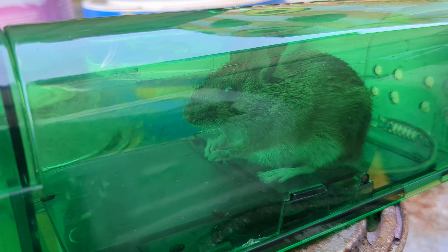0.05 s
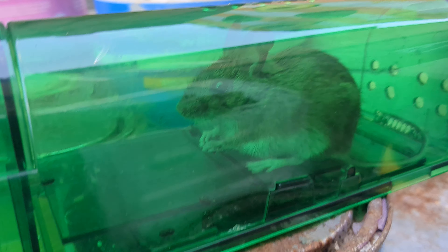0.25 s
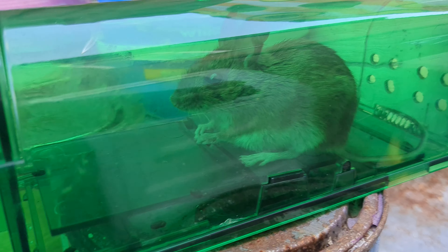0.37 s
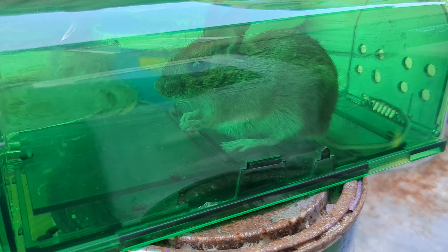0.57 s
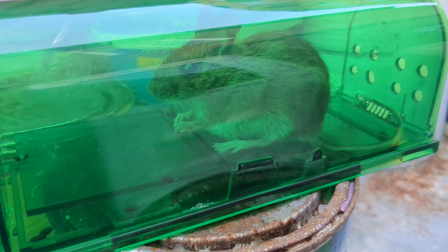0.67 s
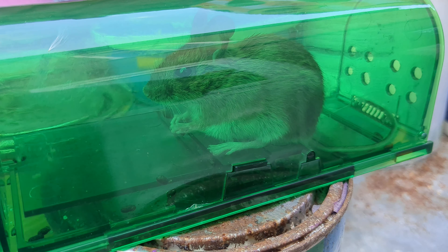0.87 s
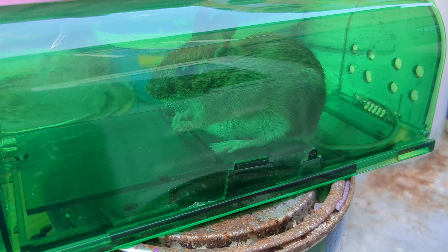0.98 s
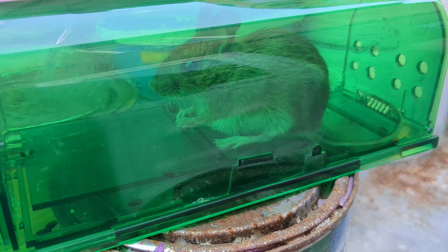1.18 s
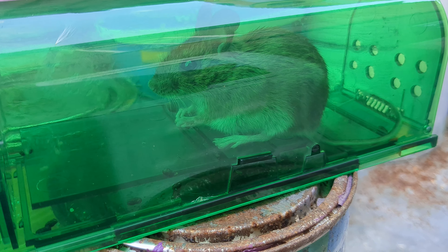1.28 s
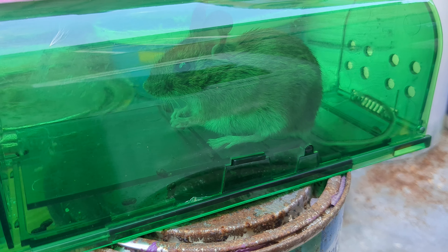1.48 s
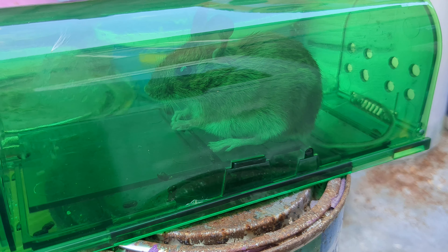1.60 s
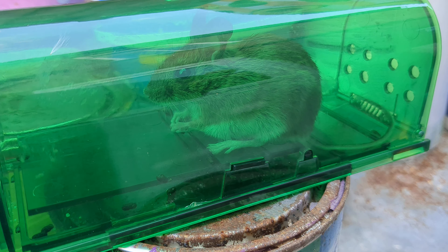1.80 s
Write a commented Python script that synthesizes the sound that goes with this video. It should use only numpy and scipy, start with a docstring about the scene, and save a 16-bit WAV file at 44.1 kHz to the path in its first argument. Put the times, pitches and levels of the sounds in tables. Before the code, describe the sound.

A hand rubs the camera close to the right microphone from about 0.3 to 0.5 seconds, a short rasp with a low juddering bump and a tiny squeak. Distant traffic rumble and engine drone continue throughout, with light wind on the microphone early on. Faint finger scuffs come near 0.9 and 1.5 seconds. Small birds give thin rising chirps from 0.8 seconds, clearest around 1.2 and 1.8.

```python
"""Outdoors, a hand shifts its grip on the camera. Skin rasps across the case by the right microphone
port, sticks and slips in a low judder that rings the case, squeaks once and bumps the body, with light
brushes and faint scuffs before and after. Behind it sit a distant traffic rumble with an engine drone,
an airy hiss, light wind on the ports and a few rising chirps of small birds."""
import sys
import numpy as np
from scipy import signal
from scipy.fft import rfft, irfft
from scipy.io import wavfile

SR = 44100
rng = np.random.default_rng(int(sys.argv[2]) if len(sys.argv) > 2 else 0)


def unload_audio(sound):
    """Save the sound as a 16-bit wav file, at the path given as the first command line argument."""
    columns = np.transpose(np.atleast_2d(sound))
    # keep every value between -1 and 1, then stretch to whole-number steps
    steps = np.round(np.clip(columns, -1, 1) * 32767)
    wavfile.write(sys.argv[1], SR, steps.astype(np.int16))


N = 81585


def undb(db):
    """Decibels to gain."""
    return 10 ** (np.asarray(db) / 20)


def unit(x):
    """Scale to rms 1."""
    return x / np.sqrt(np.mean(x ** 2))


def clock():
    """Time of each sample in seconds."""
    return np.arange(N) / SR


def fader(curve):
    """Gain ride through (t/s, level/dB) points, fading fast outside them."""
    s, db = np.array(curve).T
    t = clock()
    outside = np.maximum(s[0] - t, 0) + np.maximum(t - s[-1], 0)
    return undb(np.interp(t, s, db)) * np.exp(-20 * outside)


def colour(x, points):
    """EQ through (f/Hz, level/dB) points, rolled off below the first; rms 1."""
    hz, db = np.array(points).T
    f = np.maximum(np.fft.rfftfreq(N, 1 / SR), 1)
    gain = undb(np.interp(np.log(f), np.log(hz), db)) * np.minimum(f / hz[0], 1) ** 2
    return unit(irfft(rfft(x) * gain, N))


def noise():
    """White noise."""
    return rng.standard_normal(N)


def band(hz, width_hz):
    """A band of noise around one frequency; rms 1."""
    f = np.fft.rfftfreq(N, 1 / SR)
    return unit(irfft(rfft(noise()) / (1 + ((f - hz) / width_hz * 2) ** 4), N))


def grains(per_s, scatter_db):
    """Dense tiny clicks at random times, their sizes spread by scatter_db."""
    clicks = (rng.random(N) < per_s / SR) * np.sign(noise())
    return clicks * undb(scatter_db * np.minimum(rng.exponential(size=N), 4))


def swell(start, length, attack, release):
    """Attack, hold and exponential release, in seconds."""
    t = clock() - start
    return np.clip(t / attack, 0, 1) * np.exp(-np.maximum(t - length, 0) / release)


def near_right(make, left_db):
    """A sound at the right port and its weaker, unrelated share at the left."""
    return np.array([undb(left_db) * make(), make()])


def engine():
    """A far engine drones in narrow bands of noise."""
    drones = [(46.1, 12.4, -45.5), (219.7, 32, -59.5), (250, 30.6, -54.5), (382.7, 22, -65),
              (673, 65, -65.5)]  # engine bands: f/Hz, width/Hz, level/dB
    ride = [(0, -1.5), (.8, 1), (1.55, -1.5), (1.85, -9.5)]  # swell and fade: t/s, level/dB
    return sum(undb(db) * band(hz, width_hz) for hz, width_hz, db in drones) * fader(ride)


def traffic(port_spacing_m=.1, left_lead_s=.00034):
    """Diffuse rumble, alike at both ports in the bass, and the engine; both reach the left first."""
    eq = [(25, -1), (60, 4), (110, -3), (180, -2), (270, -3), (320, -9.5), (700, -9), (950, -10.5),
          (1300, -20.5), (2000, -25.5), (3000, -37.5), (4200, -48), (5500, -54), (9000, -56.5),
          (15000, -58)]  # rumble spectrum: f/Hz, level/dB
    ride = [(0, -44), (.6, -47), (1.05, -47.5), (1.45, -49), (1.85, -50)]  # rumble loudness: t/s, level/dB
    likeness = .93 * np.sinc(2 * np.fft.rfftfreq(N, 1 / SR) * port_spacing_m / 343)
    mid, side = (irfft(rfft(noise()) * np.sqrt(1 + sign * likeness), N) for sign in (1, -1))
    rumble = np.array([colour(mid + side, eq), colour(mid - side, eq)]) * fader(ride)
    engine_side = undb(-20.5) * np.array([[1], [-1]]) * engine()
    left, right = rumble + engine() + engine_side
    return np.array([left, np.interp(clock() - left_lead_s, clock(), right)])


def air():
    """A faint airy hiss, stronger on the right."""
    eq = [(1500, -2), (2800, 1.5), (4200, 0), (5200, -12), (7000, -13.5), (10000, -24), (15000, -31)]  # hiss spectrum: f/Hz, level/dB
    ride = [(0, -67.5), (.7, -66.5), (1.2, -68.5), (1.5, -67.5), (1.6, -70.5), (1.85, -67.5)]  # hiss loudness: t/s, level/dB
    return fader(ride) * near_right(lambda: colour(noise(), eq), left_db=-7)


def wind(right_db=-8):
    """Light, low buffeting, different at each port."""
    gusts = [(0, -44.5), (.22, -31.5), (.36, -32.5), (.6, -36.5), (.75, -45.5), (1.15, -66), (1.29, -40.5),
             (1.42, -48.5), (1.85, -57)]  # wind on the ports: t/s, level/dB
    eq = [(15, 15.5), (35, -1.5), (70, -2), (130, -19), (250, -33.5), (800, -65.5)]  # buffeting spectrum: f/Hz, level/dB
    return fader(gusts) * np.array([colour(noise(), eq), undb(right_db) * colour(noise(), eq)])


def rasp():
    """Skin ridges catch on the case in thousands of tiny clicks a second."""
    ride = [(0, -56.5), (.29, -55), (.335, -45.5), (.37, -35), (.412, -30), (.432, -32), (.443, -43.5),
            (.46, -32), (.49, -52), (.6, -69), (.7, -79)]  # loudness of the drag: t/s, level/dB
    eq = [(300, 8), (800, 6), (1400, 4), (2400, 0.5), (4000, -12), (5500, -28), (9000, -33), (15000, -43)]  # rasp spectrum: f/Hz, level/dB
    return fader(ride) * near_right(lambda: colour(grains(per_s=4400, scatter_db=0), eq), left_db=-39)


def skin_hiss(eq, tilt):
    """Grainy hiss of light skin contact, its EQ tilted by so many dB per octave."""
    tilted = [(hz, db + tilt * np.log2(hz / eq[0][0])) for hz, db in eq]
    return near_right(lambda: colour(grains(per_s=9000, scatter_db=-.5), tilted), left_db=-26)


def brushes():
    """Skin sweeps lightly over the case in soft strokes of hiss."""
    # strokes: t/s, length/s, attack/s, level/dB, tilt/(dB per octave)
    strokes = [(0.104, 0.067, .02, -78, 21), (0.292, 0.069, 0.032, -51, 8.5),
               (0.332, 0.0837, 0.04, -39.5, -1.5), (0.441, 0.06, 0.008, -57, -4.5),
               (0.505, 0.07, 0.018, -59, 1.5), (.57, 0.098, .01, -71, 5)]
    eq = [(1000, -20), (3000, 7.5), (5000, 0.5), (6800, -3), (8500, -9), (12000, -17), (14000, -27),
          (15500, -25)]  # brush spectrum: f/Hz, level/dB
    return sum(undb(db) * swell(start, length, attack, release=.0076) * skin_hiss(eq, tilt)
               for start, length, attack, db, tilt in strokes)


def scuffs():
    """Fingers graze the case in tiny ticks of hiss."""
    touches = [(0.215, 0.0016, -70, 1), (0.262, .008, -72, 6), (0.873, 0.011, -63.5, 2),
               (0.898, .004, -64, -1), (1.445, 0.0056, -65.5, 1), (1.479, .008, -70.5, 1),
               (1.512, 0.021, -62.5, -6)]  # finger touches: t/s, length/s, level/dB, tilt/(dB per octave)
    eq = [(1200, -1), (3500, 5), (7000, -3.5), (10000, -7.5), (12500, -13), (15000, -26)]  # scuff spectrum: f/Hz, level/dB
    return sum(undb(db) * swell(start, length, attack=.0018, release=.007) * skin_hiss(eq, tilt)
               for start, length, db, tilt in touches)


def slips(rate_hz=165, jitter=.25, scatter_db=2, noise_db=-3, ring_db=-6.5):
    """Skin sticks and slips at an uneven rate; each slip knocks the case and rings it briefly."""
    eq = [(50, -26), (90, 5), (135, 6.5), (200, -5.5), (420, -4), (700, -7), (1000, -21.5), (2000, -32.5),
          (6000, -65)]  # knock spectrum: f/Hz, level/dB
    modes = [(141.5, 0.079, 0.5), (296, 0.018, 1), (413, 0.037, -5), (496, 0.019, -4.5), (706, 0.021, -14)]  # case resonances: f/Hz, t60/s, level/dB
    gap, size = rng.standard_normal((400, 2)).T
    onsets = (np.cumsum(np.exp(jitter * gap)) * SR / rate_hz).astype(int)
    pulses = np.bincount(onsets, undb(scatter_db * size), N)[:N]
    kicks = unit(signal.hilbert(pulses).imag)  # each pulse becomes a two-way swing
    force = kicks + undb(noise_db) * noise()
    t = clock()
    case = sum(undb(db - 60 * t / t60) * np.sin(2 * np.pi * hz * t) for hz, t60, db in modes)
    ring = unit(signal.fftconvolve(force, case)[:N])
    return unit(colour(force, eq) + undb(ring_db) * ring)


def judder():
    """The dragging finger shudders in one short, low burst of slips by the right port."""
    ride = [(.30, -69), (.348, -39), (.362, -32.5), (.371, -17), (.395, -20.5), (.42, -15.5), (.44, -27.5),
            (.457, -20.5), (.485, -54), (.53, -49)]  # stick-slip loudness: t/s, level/dB
    return near_right(slips, left_db=-29) * fader(ride)


def bumps():
    """The hand presses and lets go; each bump is one soft swing of pressure at the ports."""
    # swings: t/s, width/s, level/dB, left minus right/dB, polarity (1 suction first, -1 push first)
    swings = [(0.3227, 0.0024, -40.5, 21, 1), (.413, .0045, -52, -8, 1), (0.435, 0.0034, -29, -16, -1),
              (0.4463, 0.0018, -25, 13, -1), (0.452, .012, -26, -21, 1), (0.491, 0.007, -33.5, -22, 1)]
    pressure = 0
    for centre, width, db, pan_db, polarity in swings:
        u = (clock() - centre) / width
        gains = undb(db + np.array([[pan_db], [-pan_db]]) / 2)
        pressure = pressure + np.sign(polarity) * gains * u * np.exp((1 - u ** 2) / 2)
    return pressure


def squeak(at_s=.366, width_s=.016, peak_db=-46):
    """The skin hisses at one pitch just before it grips."""
    envelope = undb(peak_db) * np.exp(-((clock() - at_s) / width_s) ** 2)
    return envelope * near_right(lambda: band(6500, width_hz=1600), left_db=-39)


def birds(left_db=-15, echo_db=-10, echo_delay_s=.015, echo_t60_s=.11):
    """Short, slightly airy whistles that rise and level off, with a brief echo from the walls."""
    # whistles: t/s, length/s, start f/Hz, end f/Hz, level/dB, wobble/share of pitch,
    # bend (1 is a straight rise, more levels off)
    chirps = [(0.77, 0.043, 4320, 4340, -67.5, 0.019, 1.5), (1.024, 0.026, 5450, 5550, -77, .01, 1.5),
              (1.083, 0.043, 6200, 6550, -75, .012, 1.8), (1.088, 0.051, 4900, 5270, -75, .012, 1.8),
              (1.172, 0.053, 3160, 4680, -61.5, 0.063, 1.8), (1.192, 0.055, 3700, 4170, -73, 0.075, 1.5),
              (1.678, 0.034, 6360, 6460, -65.5, .005, 1.3), (1.683, 0.029, 4870, 5210, -61.5, 0.0059, 1.5),
              (1.705, 0.023, 6520, 6580, -70.5, .006, 1.5), (1.772, 0.032, 5660, 6020, -65, 0.0065, 1.6),
              (1.789, 0.02, 5850, 6400, -60, .008, 1.1), (1.778, .032, 4650, 5130, -53, .003, 2.5)]
    hiss_eq = [(4500, 2), (7000, -2), (10000, -7), (13000, -14), (15000, -24)]  # airy edge of each chirp: f/Hz, level/dB
    hiss = undb(-22) * colour(noise(), hiss_eq)
    t, song = clock(), 0
    for start, length, start_hz, end_hz, db, wobble, bend in chirps:
        progress = np.clip((t - start) / length, 0, 1)
        glide_hz = end_hz + (start_hz - end_hz) * (1 - progress) ** bend
        hz = glide_hz * (1 + wobble * band(160, width_hz=250))
        whistle = np.sqrt(2) * np.sin(2 * np.pi * np.cumsum(hz) / SR)
        song = song + undb(db) * np.sin(np.pi * progress) * (whistle + hiss)
    tail = (t > echo_delay_s) * undb(-60 * t / echo_t60_s)

    def with_echo():
        walls = unit(tail * noise()) / np.sqrt(N)
        return song + undb(echo_db) * signal.fftconvolve(song, walls)[:N]
    return np.array([undb(left_db) * with_echo(), with_echo()])


def scene():
    """The hand on the camera over the outdoor bed and the birds."""
    bed = traffic() + air() + wind()
    hand = rasp() + brushes() + scuffs() + judder() + bumps() + squeak()
    return bed + hand + birds()


def record(dry, fade_in_s=.003, top_hz=15750):
    """A quick fade-in and a steep cut of the top end."""
    opened = dry * np.minimum(clock() / fade_in_s, 1)
    return signal.sosfilt(signal.ellip(10, .2, 80, top_hz, fs=SR, output="sos"), opened)


dry = scene()
out = record(dry)
unload_audio(out)
```